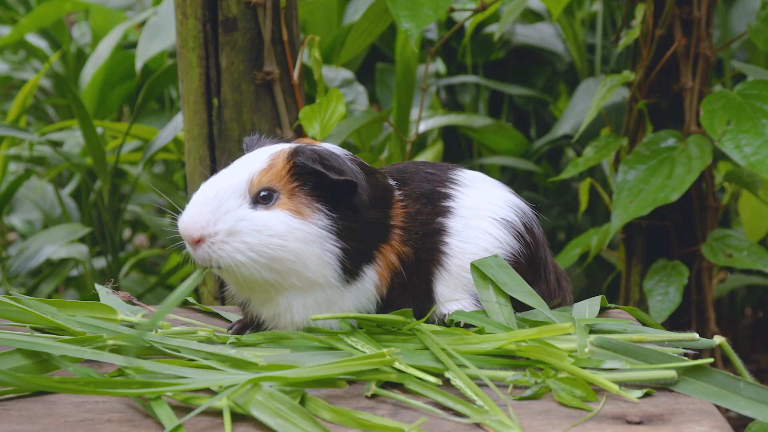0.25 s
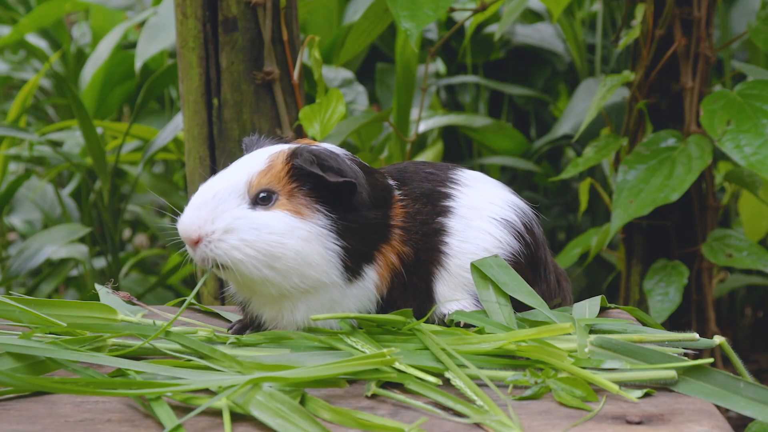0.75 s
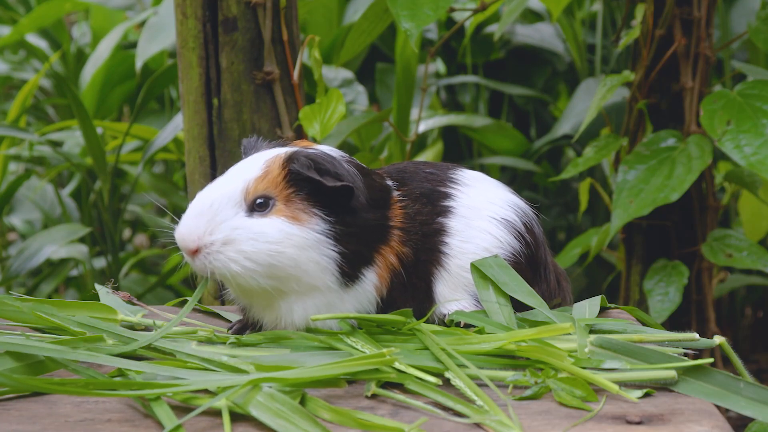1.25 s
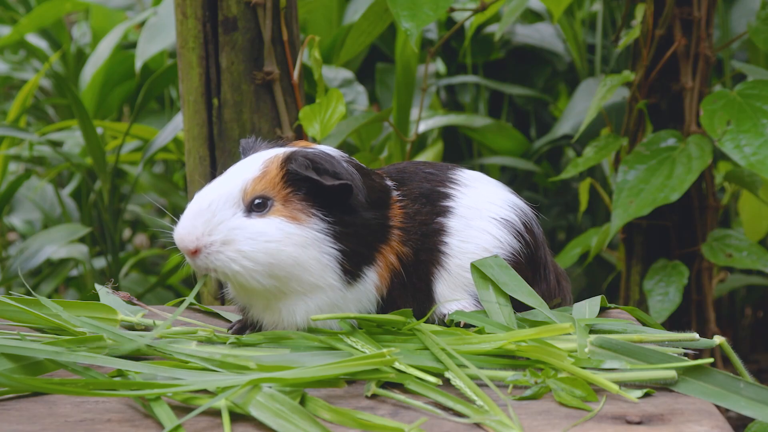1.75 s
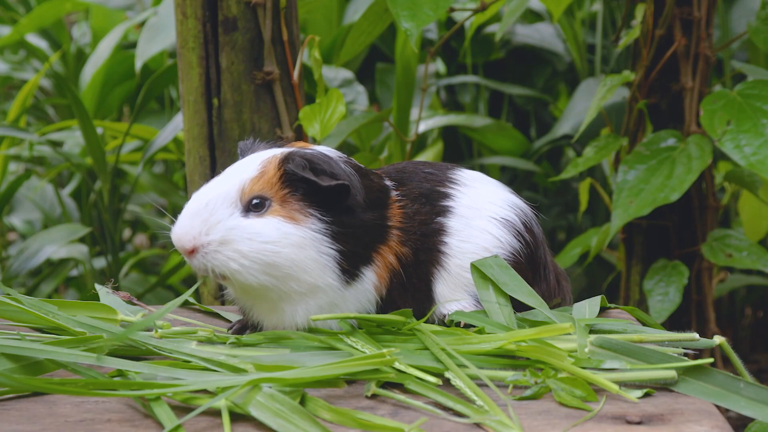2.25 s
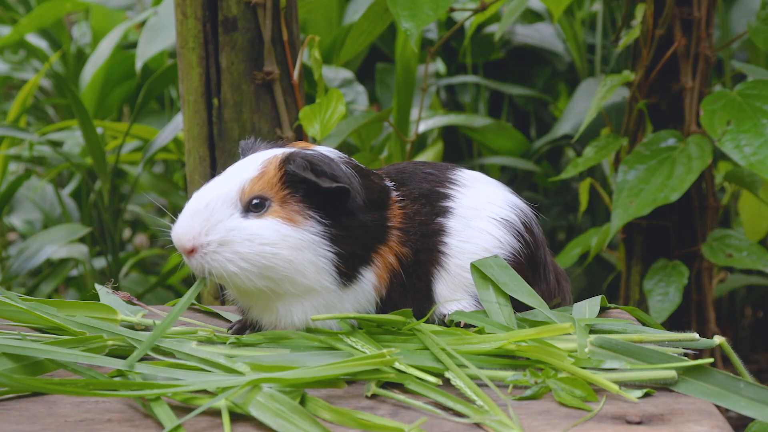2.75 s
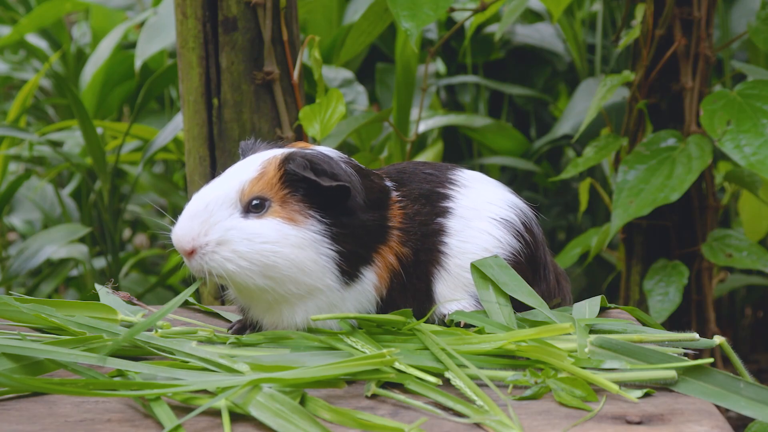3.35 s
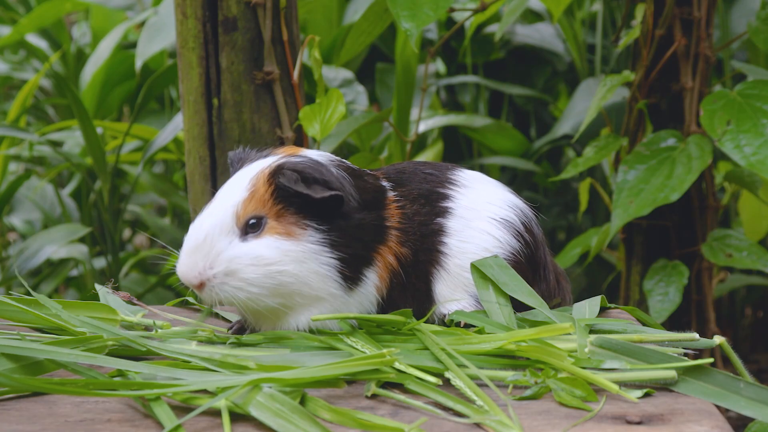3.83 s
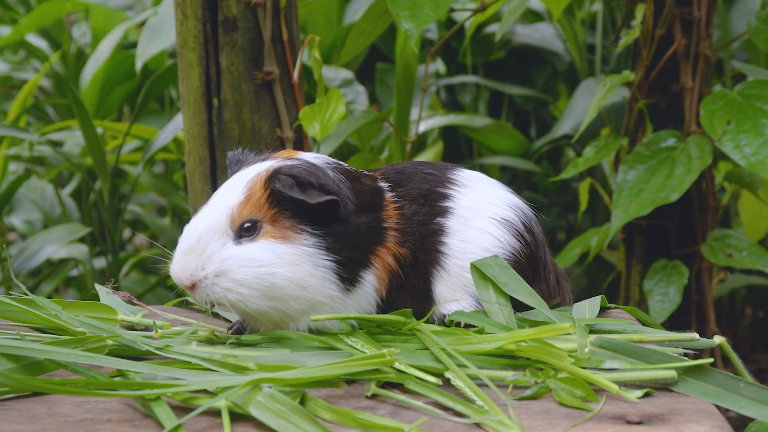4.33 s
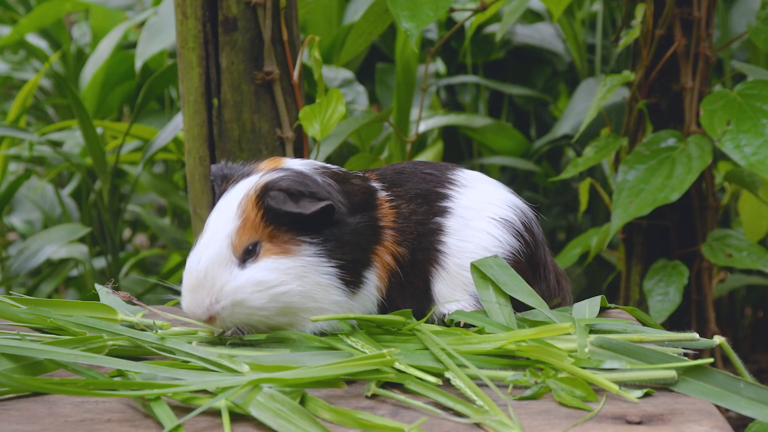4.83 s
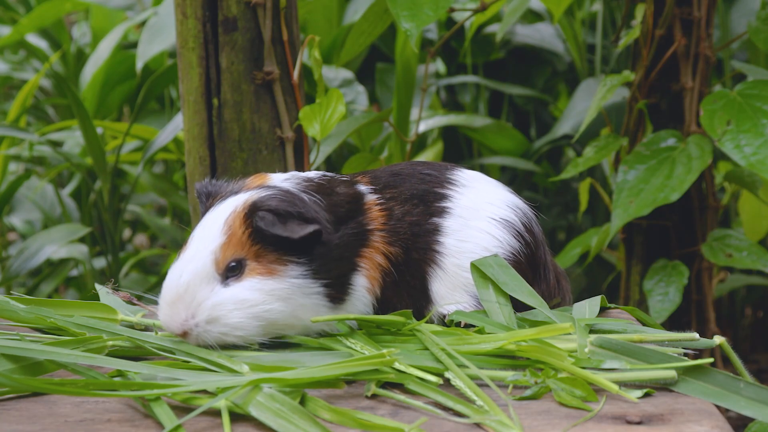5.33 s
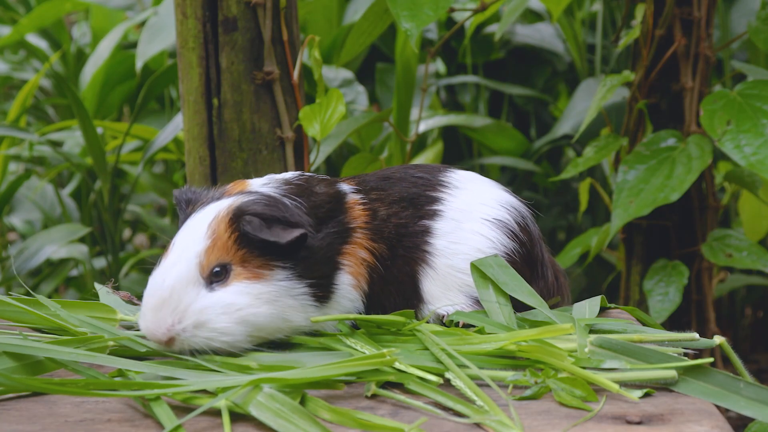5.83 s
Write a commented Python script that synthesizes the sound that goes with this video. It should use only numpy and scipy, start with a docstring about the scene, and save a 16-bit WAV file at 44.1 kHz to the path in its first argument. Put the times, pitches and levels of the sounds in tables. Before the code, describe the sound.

Small, dry-edged crunches run about six a second in uneven bouts, miked very close outdoors, with light rustling and sharp little fibre snaps. Behind them an even, rapid bird chirp repeats with hazy echoes over lumpy low rumble, faint hum and air. Soft wooden knocks cluster early, a hard tooth click comes at mid-stretch, a blade slides later, a stalk rips, and a firm snap and low thump come near the end.

```python
"""A guinea pig chews fresh grass on a board in a garden, close to one microphone.
From the start a low rumble, hum and air lie under grinding teeth, about six strokes a second: swarms of grains.
Blades rustle and tick, fibres snap in noise bursts, and a bird repeats one quick falling chirp with echoes.
Then the board knocks softly as damped modes, the incisors click and squeak, and faint far calls glide by.
Late on, a stalk tears with a bright ring of narrow noise bands, and the chewing goes on."""
import sys
import numpy as np
from scipy import signal
from scipy.fft import rfft, irfft
from scipy.io import wavfile

SR = 44100
rng = np.random.default_rng(int(sys.argv[2]) if len(sys.argv) > 2 else 0)


def materialize(psi):
    """Save the field psi as 16-bit PCM at rate SR to the path in sys.argv[1].

    A 1-D psi becomes a single channel; in a 2-D psi each row is a channel.
    """
    bounded = np.clip(np.atleast_2d(psi).T, -1, 1)
    quanta = np.round(bounded * 32767).astype(np.int16)
    wavfile.write(sys.argv[1], SR, quanta)


N = 267946
TIME = np.arange(N) / SR  # seconds


def amp(db):
    """Decibels to gain."""
    return 10 ** (np.asarray(db) / 20)


def unit(x):
    """Scales to rms 1."""
    return x / np.sqrt(np.mean(x ** 2) + 1e-20)


def curve(rows):
    """Gain over time from rows of (time [s], level [dB])."""
    return amp(np.interp(TIME, *np.transpose(rows)))


def add(mix, s, sound):
    """Mixes a sound in at s seconds, or at the very start if s is negative."""
    part = mix[max(round(s * SR), 0):][:len(sound)]
    part += sound[:len(part)]


def colour(x, points):
    """Filters by a spectrum of (frequency [Hz], level [dB]); the result has rms 1."""
    hz, db = np.transpose(points)
    f = np.fft.rfftfreq(N, 1 / SR)
    gain = amp(np.interp(np.log(f + 1), np.log(hz), db))
    return unit(irfft(rfft(x) * gain, N))


def band(x, low_hz, high_hz):
    """Causal band-pass."""
    sos = signal.butter(2, [low_hz, high_hz], "band", fs=SR, output="sos")
    return signal.sosfilt(sos, x)


def drift(rate_hz):
    """Slow random wander of rms 1: noise with its fast part rolled off."""
    f = np.fft.rfftfreq(N, 1 / SR)
    return unit(irfft(rfft(rng.standard_normal(N)) * np.exp(-(f / rate_hz) ** 2), N))


def grains(per_s, spread_db):
    """Tiny breaks at random moments, their sizes spread exponentially in decibels; rms 1."""
    size = amp(spread_db * np.minimum(rng.exponential(1, N), 4))
    sign = rng.choice([-1, 1], N)
    breaks = rng.random(N) < per_s / SR
    return unit(size * sign * breaks)


def envelope(start, length, attack_s, release_s):
    """Rises, holds until its length is over, then dies away."""
    t = TIME - start
    return np.clip(t / attack_s, 0, 1) * np.exp(-np.maximum(t - length, 0) / release_s)


def swell(middle, length):
    """A smooth rise and fall of power."""
    return np.exp(-(2 * (TIME - middle) / length) ** 2)


def fuzzy(hz, width_hz):
    """Narrow noise of rms 1 that follows a pitch curve."""
    wander = (drift(width_hz) + 1j * drift(width_hz))[:len(hz)]
    carrier = np.exp(2j * np.pi * np.cumsum(hz) / SR)
    return unit((wander * carrier).real)


def garden(rumble_db=-1.0, deep_db=-1.0, air_db=-47.6, swell_db=0.6, lumps_db=1.27):
    """Lumpy low noise with deep swells, a faint phase-wavering hum and a soft wash of air."""
    # slow level of the rumble: (time [s], relative level [dB])
    rumble_level = [(0, -41.5), (1.5, -41), (2.6, -42.5), (3.15, -45), (3.7, -41.5), (4.15, -44.5),
                    (4.4, -42), (5.0, -44.5), (5.55, -44), (6.08, -41.5)]
    # spectrum of the rumble: (frequency [Hz], relative level [dB])
    rumble_colour = [(15, -17), (30, 0.5), (55, 0.5), (80, 4), (120, -0.5), (200, -2), (250, -8),
                     (310, -17.5), (500, -22.5), (900, -20), (3000, -57)]
    # deep swells over it: (middle [s], length [s], relative level [dB])
    deep_swells = [(0.01, .06, -35), (0.337, .14, -37), (0.573, .07, -38.5), (0.747, 0.083, -34.5),
                   (0.903, .13, -35), (1.11, .18, -37), (1.43, .11, -38), (2.478, .11, -39.5),
                   (5.67, 0.075, -42), (5.872, 0.27, -36.5)]
    # spectrum of the swells: (frequency [Hz], relative level [dB])
    swell_colour = [(15, -18), (30, 2), (55, 4.5), (80, 4), (120, -1.5), (200, -3.5), (250, -11),
                    (310, -17), (500, -22), (900, -24.5), (3000, -56)]
    # spectrum of the garden air: (frequency [Hz], relative level [dB])
    air_colour = [(100, 8), (330, 5.5), (560, 2), (800, -1.5), (1400, -1), (2100, -1.5), (3200, -4.5),
                  (3800, -13), (5200, -13), (6100, -13.5), (8000, -16), (11000, -17.5), (15500, -20.5)]
    hum_hz, hum_db, fade_db_per_s = 100, -50, 0.28  # the fade slowly quietens the air

    lumps = amp(rumble_db + lumps_db * drift(rate_hz=10.5))
    rumble = lumps * curve(rumble_level) * colour(rng.standard_normal(N), rumble_colour)

    power = sum(amp(db) ** 2 * swell(s, length) for s, length, db in deep_swells)
    deep = amp(deep_db) * np.sqrt(power) * colour(rng.standard_normal(N), swell_colour)

    hum_phase = 2 * np.pi * hum_hz * TIME + .3 * drift(rate_hz=2)
    hum = amp(hum_db) * np.sqrt(2) * np.sin(hum_phase)

    air_level = amp(air_db - fade_db_per_s * TIME + swell_db * drift(rate_hz=13.0))
    air = air_level * colour(rng.standard_normal(N), air_colour)
    return rumble + deep + hum + air


def chewing(level_db=-0.5, per_s=2000, crisp_hz=2400):
    """Molar strokes, a catch and then a grind, crush a swarm of wet cells; fresh blades are crisper."""
    # bouts of even chewing; a one-stroke row is a single crunch, or at 5.112 s a hard catch just before # the
    # next stroke: (first stroke [s], last stroke [s], strokes [count], # relative level [dB], crispness [dB],
    # length of a grind [s])
    bouts = [(0.04, 0.04, 1, -49.5, -4, 0.067), (0.322, 1.14, 6, -47, 0, .028),
             (0.66, 0.66, 1, -40.5, 0.5, .018), (1.01, 1.01, 1, -45, 0.5, .027),
             (1.382, 1.9, 4, -46.5, -4, 0.064), (2.072, 2.072, 1, -41, -2, .036),
             (2.236, 2.236, 1, -45.5, 1, 0.038), (2.283, 2.58, 3, -45, -1, 0.038),
             (2.69, 2.9, 3, -47.5, 2.5, 0.056), (2.83, 2.83, 1, -41, 1, 0.026),
             (3.118, 3.83, 5, -44.5, -1.5, 0.037), (3.911, 4.39, 4, -42, -0.5, 0.026),
             (4.561, 5.457, 7, -44.5, 0, 0.03), (5.112, 5.112, 1, -40.5, 0, 0.0086),
             (5.682, 5.99, 3, -45, 0, 0.048)]
    # spectrum of the crunch: (frequency [Hz], relative level [dB])
    chew_colour = [(300, -7.5), (800, -8), (1350, 1.5), (2000, 1), (3200, 1), (3800, -4.5), (4500, -10),
                   (5400, -16.5), (6100, -12), (6800, -13.5), (8000, -20), (11000, -23.5), (16000, -37)]
    # in a bout, the molars catch the blade just before each grind
    catch_lead_s, catch_db, catch_stretch = .048, -3.5, 1.07
    # strokes differ a little; a soft munching goes on between them
    stroke_spread_db, munch_db = 0.27, -56

    power = np.full((2, N), amp(munch_db) ** 2)  # below and above crisp_hz
    for first, last, count, db, crisp_db, length in bouts:
        for s in np.linspace(first, last, round(count)):
            stroke = swell(s, length)
            if round(count) > 1:  # a one-stroke row has no catch of its own
                stroke = stroke + amp(catch_db) ** 2 * swell(s - catch_lead_s, catch_stretch * length)
            stroke_db = np.array([[db], [db + crisp_db]]) + stroke_spread_db * rng.standard_normal()
            power += amp(stroke_db) ** 2 * stroke

    crunch = amp(level_db) * colour(grains(per_s, spread_db=3.0), chew_colour)
    dull = signal.sosfiltfilt(signal.butter(2, crisp_hz, fs=SR, output="sos"), crunch)
    crisp = crunch - dull
    return np.sqrt(power[0]) * dull + np.sqrt(power[1]) * crisp


def grass(stir_db=-3.0, tick_db=-1.0, slide_db=-1):
    """Blades rustle as grains and tick, each at its own pitch; some slide in between the lips."""
    # the muzzle stirs the grass: (start [s], length [s], relative level [dB])
    stirs = [(0.01, .02, -59), (0.234, 0.064, -56), (0.45, 0.29, -59), (0.588, 0.076, -53),
             (0.936, .11, -54), (1.262, 0.15, -55), (1.62, .11, -55), (1.829, .22, -57), (2.6, .12, -59),
             (3.56, .04, -59), (3.88, .04, -59), (4.3, .05, -56), (4.51, 0.11, -58), (5.26, 0.15, -54.5),
             (5.62, .32, -55)]
    # spectrum of the rustle: (frequency [Hz], relative level [dB])
    stir_colour = [(1500, -4), (3200, 2), (4500, -8), (5400, -16), (6100, 5), (6900, -6), (8000, -1),
                   (9500, -3), (10700, -7), (12000, -5), (16000, -15)]
    # where single blades tick: (frequency [Hz], width [Hz], relative level [dB])
    blades = [(3270, 850, 7), (6370, 1000, 0), (8240, 2140, -16), (10400, 1400, -4), (12400, 3300, -8)]
    # blades sliding through the mouth: (start [s], length [s], relative level [dB], release [s])
    slides = [(1.262, 0.022, -50, .018), (3.375, 0.052, -41.5, 0.072)]
    # spectrum of the slides: (frequency [Hz], relative level [dB])
    slide_colour = [(1500, 0.5), (3000, 4.5), (4300, 0.5), (5300, -13), (6100, 1.5), (6700, -7),
                    (7500, -24), (16000, -38)]
    attack_s, release_s, resting_db = 0.014, 0.086, -67.5  # stirred blades settle to a faint rustle
    slide_attack_s = 0.013

    rustle = colour(grains(per_s=1000, spread_db=-0.5), stir_colour)
    ticks = np.zeros(N)
    for hz, width, db in blades:
        blade = band(grains(per_s=55, spread_db=2.5), hz - width / 2, hz + width / 2)
        ticks += amp(db) * unit(blade)
    stirring = np.max([amp(db) * envelope(s, length, attack_s, release_s) for s, length, db in stirs], axis=0)
    moving = np.maximum(stirring, amp(resting_db))
    stir = moving * (amp(stir_db) * rustle + amp(tick_db) * unit(ticks))

    sliding = sum(amp(db) * envelope(s, length, slide_attack_s, release)
                  for s, length, db, release in slides)
    slide = amp(slide_db) * sliding * colour(grains(per_s=2100, spread_db=2.0), slide_colour)
    return stir + slide


def snaps(level_db=-3):
    """A fibre gives way in a three-band noise burst that dies within milliseconds."""
    # the loudest fibres snapping: (time [s], relative body [dB], edge [dB], fizz [dB], decay constant [s])
    fibres = [(.0223, -51, -54, -40, .001), (.263, -47, -42, -38, .0008), (.27, -35, -39, -37, .0016),
              (0.356, -31, -38, -51, .0009), (.401, -43, -38.5, -52, .0022),
              (.6081, -35, -34.5, -21.5, .001), (.952, -46, -42, -39, .001), (.968, -45, -50, -40, .001),
              (1.001, -41, -40, -49, .0009), (1.0167, -37, -39, -39, .002), (1.035, -48, -50, -36, .0011),
              (1.1042, -36, -40, -38, 0.0011), (1.3048, -42, -35.5, -42, .001),
              (1.3305, -40, -38, -43, .001), (1.3694, -43, -48, -40, .001), (1.428, -58, -41, -49, .002),
              (1.8465, -45, -37.5, -42.5, 0.012), (2.277, -32, -38, -48, .0011),
              (2.672, -53, -41.5, -57, .005), (2.818, -51, -43, -62, .012),
              (2.901, -47, -43.5, -61.5, 0.0054), (3.0832, -40, -38.5, -56, 0.0025),
              (3.1934, -39, -41, -61, .001), (3.932, -53, -34.5, -44, 0.0036),
              (4.531, -49, -37, -44, 0.0015), (4.6234, -42, -39, -50, .001),
              (5.0245, -37, -41, -48, 0.0013), (5.369, -46, -39, -51, .0095), (5.395, -35, -40, -41, .001),
              (5.677, -46, -37, -60, 0.0025), (5.8285, -24.5, -23, -30, 0.00056)]
    # body, edge and fizz: (low edge [Hz], high edge [Hz])
    snap_bands = [(1000, 1360), (4000, 8040), (9000, 12600)]
    out, t = np.zeros(N), np.arange(SR // 20) / SR
    for s, *levels, decay in fibres:
        fade = np.exp(-t / decay)
        burst = np.zeros(len(t))
        for db, edges in zip(levels, snap_bands):
            burst += amp(db) * unit(band(fade * rng.standard_normal(len(t)), *edges))
        add(out, s, burst * np.sqrt(np.mean(fade ** 2)))  # a shorter snap carries less energy
    return amp(level_db) * out


def foliage(near_t60=0.46, far_db=-15, far_t60=0.59, build_s=0.0061, low_hz=2700):
    """Dense noise echoes from near leaves and far trees; leaves scatter high notes best."""
    t = np.arange(SR // 2) / SR
    near = np.exp(-np.log(1000) * t / near_t60)
    far = amp(far_db) * np.exp(-np.log(1000) * t / far_t60)
    build = 1 - np.exp(-(t / build_s) ** 2)
    echo = rng.standard_normal(len(t)) * (near + far) * build
    high_pass = signal.butter(4, low_hz, "high", fs=SR, output="sos")
    return signal.sosfilt(high_pass, echo / np.linalg.norm(echo))


def bird(level_db=-28, lead_s=.007, waver=.012, still_db=-4, swaying_db=-4.5):
    """A nearly pure tone drops fast; trunks repeat it and the foliage smears it."""
    # chirps, nearly three a second, each begun lead_s early: (time [s], relative level [dB])
    chirps = [(.113, -0.5), (0.483, -2), (.854, -1.5), (1.21, -1), (1.568, -0.5), (1.936, -2), (2.27, 0),
              (2.627, -1), (2.975, 0), (3.339, -1), (3.705, 0), (4.049, 0.5), (4.409, -0.5), (4.765, 0),
              (5.126, 0), (5.498, 0), (5.847, -0.5)]
    # one chirp: (time from its start [s], pitch before waver [Hz], relative level [dB])
    chirp_shape = [(0, 3460, 0.5), (.003, 3170, -7), (.0075, 2900, -5), (.011, 2550, -4), (.015, 2430, -12),
                   (.021, 2400, -17)]
    # first paths from the bird, round and off the trunks: (delay [s], relative level [dB])
    paths = [(0, -13), (.0065, -9.5), (0.0155, -14.5), (.032, -26)]
    out, still = np.zeros(N), foliage()
    at, pitch, shape_db = np.transpose(chirp_shape)
    t = np.arange(0, at[-1], 1 / SR)
    shape = amp(np.interp(t, at, shape_db)) * signal.windows.tukey(len(t), .15)
    for s, db in chirps:
        hz = np.interp(t, at, pitch) * (1 + waver * rng.standard_normal())
        note = shape * np.sin(2 * np.pi * np.cumsum(hz) / SR)
        echo = amp(still_db) * still + amp(swaying_db) * foliage()  # part changes from call to call
        for delay, path_db in paths:
            add(echo, delay, amp([path_db]))
        heard = signal.fftconvolve(note, echo)
        heard *= np.linalg.norm(note) / np.linalg.norm(heard)  # keeps the energy of the dry note
        add(out, s - lead_s, amp(level_db + db) * heard)
    return out


def knocks(low_db=-7, upper_db=-0.5, split_hz=400, contact_s=0.0038, scuff=0.11):
    """A soft blow with a little scuffing rings the damped modes of the board."""
    # soft knocks: (time [s], relative level below split_hz [dB], relative level above it [dB])
    blows = [(0.262, -29.5, -49), (0.699, -28, -36.5), (0.715, -47, -36.5), (0.844, -32.5, -40),
             (0.892, -38, -41.5), (1.037, -27.5, -38), (1.077, -21.5, -30.5), (1.177, -25.5, -39),
             (1.197, -29.5, -38), (1.32, -31, -45), (1.42, -36, -45), (1.597, -32, -45), (1.949, -33, -40),
             (3.31, -34, -52), (5.826, -27, -44), (5.868, -28, -41), (5.91, -18.5, -33), (6.022, -29, -58)]
    # modes of the board, detuned at each knock: (nominal frequency [Hz], relative level [dB], t60 [s])
    board = [(71.3, -2, 0.31), (107, -2, 0.052), (183, 0.5, 0.086), (234.3, -0.5, 0.088),
             (358, -5.5, 0.051), (508, 1, 0.027), (580, -1.5, 0.043), (860, -9.5, 0.045),
             (1262, -4.5, 0.025)]
    out, t = np.zeros(N), np.arange(SR // 8) / SR
    rise = 1 - np.exp(-t / .002)
    for s, db, top_db in blows:
        push = scuff * rng.standard_normal(len(t)) * np.exp(-t / contact_s)
        push[0] = 1  # the blow itself
        for hz, mode_db, t60 in board:
            tone = rng.choice([-1, 1]) * np.sin(2 * np.pi * hz * rng.uniform(0.892, 1.126) * t)
            mode = tone * np.exp(-np.log(1000) * t / t60)
            ring = signal.fftconvolve(push, mode)[:len(t)] * rise
            strength_db = db + low_db if hz < split_hz else top_db + upper_db
            add(out, s, amp(strength_db + mode_db) * ring / abs(ring).max())
    return out


def teeth(squeak_s=0.0295, fall=0.71, width_hz=330):
    """Incisors click as short hard modes; narrow noise squeaks fall as a blade slips."""
    # incisors meeting through a stalk: (time [s], level [dB])
    bites = [(1.437, -32.5), (1.6256, -20.5), (2.2776, -43), (2.8175, -31), (5.8278, -30.5)]
    # what the incisors ring with: (frequency [Hz], relative level [dB], t60 [s])
    tooth_modes = [(1480, 2.5, 0.0072), (2940, -1, .005), (4010, -2.5, 0.0071), (5850, -4.5, 0.0061),
                   (6630, -6, 0.007), (11300, -11, 0.0033)]
    # wet grass squeaking between the teeth: (time [s], starting pitch [Hz], level [dB])
    squeaks = [(2.213, 1910, -46), (2.218, 3100, -43.5), (2.22, 5120, -51), (2.604, 1566, -51),
               (2.778, 1300, -52), (2.816, 2210, -53), (3.118, 1525, -46.5)]
    out, t = np.zeros(N), np.arange(0, squeak_s, 1 / SR)
    click = np.zeros(len(t))
    for hz, db, t60 in tooth_modes:
        click += amp(db - 60 * t / t60) * np.sin(2 * np.pi * (hz * t + rng.random()))
    cushion = np.minimum(t / .0005, 1)  # the stalk softens the first contact
    for s, db in bites:
        add(out, s, amp(db) * click * cushion)
    for s, hz, db in squeaks:
        squeak = fuzzy(hz * fall ** (t / squeak_s), width_hz)
        add(out, s, amp(db) * squeak * np.sin(np.pi * t / squeak_s))
    return out


def far_calls(level_db=-5, width_hz=130, haze_db=-3, haze_hz=420):
    """Calls swell, glide and fade; distance blurs each to a soft band in a wider haze of echoes."""
    # faint drawn-out calls, a row for each band of tone:
    # (start [s], length [s], first pitch [Hz], last pitch [Hz], relative level [dB])
    calls = [(1.68, .3, 390, 495, -51), (1.62, .39, 810, 910, -49.5), (2.5, .3, 1000, 1100, -54),
             (2.88, .45, 1020, 850, -54.5)]
    out = np.zeros(N)
    for s, length, first_hz, last_hz, db in calls:
        t = np.arange(0, length, 1 / SR)
        pitch = first_hz + (last_hz - first_hz) * t / length
        sound = amp(level_db) * fuzzy(pitch, width_hz) + amp(haze_db) * fuzzy(pitch, haze_hz)
        add(out, s, amp(db) * np.sin(np.pi * t / length) * sound)
    return out


def tear(start_s=4.304, attack_s=0.0017, rasp_db=-5):
    """A stalk tears: a rush of noise rings a few narrow resonances, with a broad rasp."""
    # what the stalk rings with: (frequency [Hz], width [Hz], relative level [dB])
    stalk_modes = [(3800, 340, 1), (4400, 230, 3), (5200, 250, -1), (6100, 450, 0), (8560, 400, 0),
                   (9000, 240, 2), (11250, 250, 0), (12300, 500, -11), (14100, 900, -14)]
    # its crack and the rip that follows: (length [s], level [dB], release [s])
    stages = [(.0045, -39.5, .0015), (.006, -38.5, 0.019)]
    rush = rng.standard_normal(N)
    ring = sum(amp(db) * band(rush, hz - width / 2, hz + width / 2) for hz, width, db in stalk_modes)
    rasp = unit(band(rng.standard_normal(N), 1500, 12000))
    sound = unit(unit(ring) + amp(rasp_db) * rasp)
    level = sum(amp(db) * envelope(start_s, length, attack_s, release) for length, db, release in stages)
    return sound * level


def scene():
    """Everything reaches one microphone, alike on both channels."""
    mono = garden() + chewing() + grass() + snaps() + bird() + knocks() + teeth() + far_calls() + tear()
    return np.array([mono, mono])


def record(dry, hiss_db=-76, edge_hz=15950):
    """A trace of hiss, opposite in the two channels, then a steep low-pass as the band limit."""
    hiss = amp(hiss_db) * unit(band(rng.standard_normal(N), 9700, 17000))
    wet = dry + np.array([hiss, -hiss])
    low_pass = signal.firwin(511, edge_hz, window=("kaiser", 9), fs=SR)
    return signal.oaconvolve(wet, low_pass[None], "same")


dry = scene()
out = record(dry)
materialize(out)
```